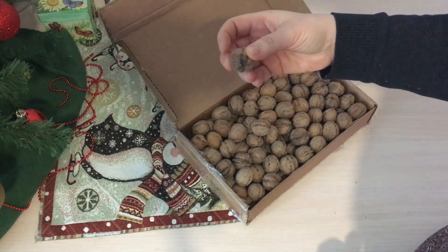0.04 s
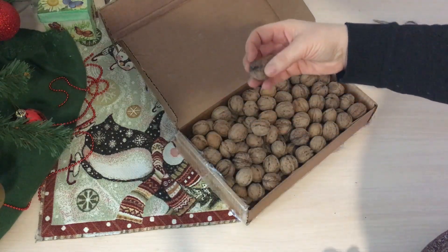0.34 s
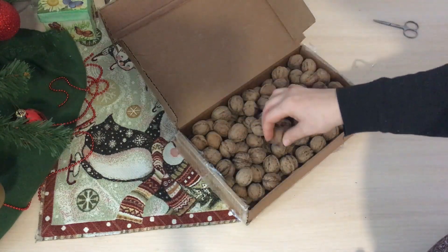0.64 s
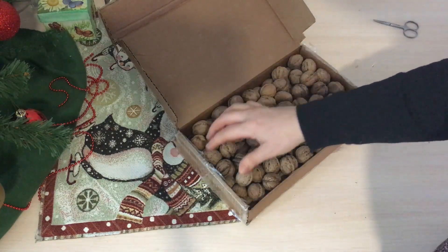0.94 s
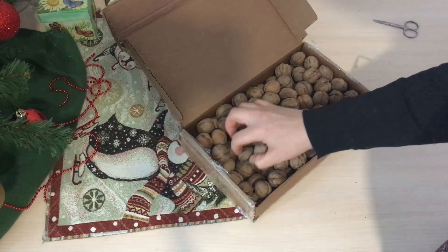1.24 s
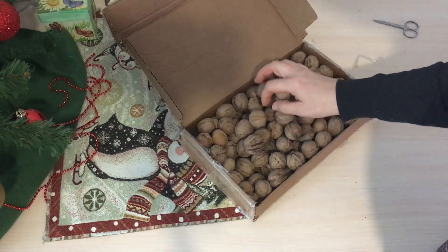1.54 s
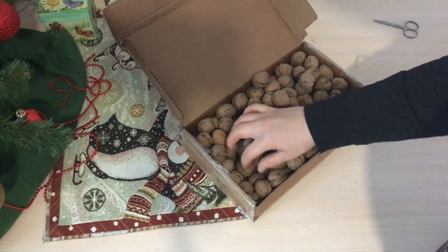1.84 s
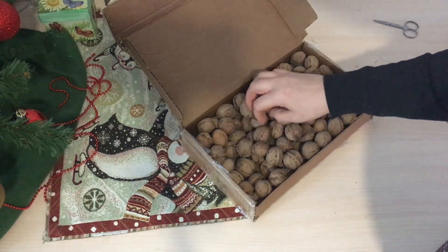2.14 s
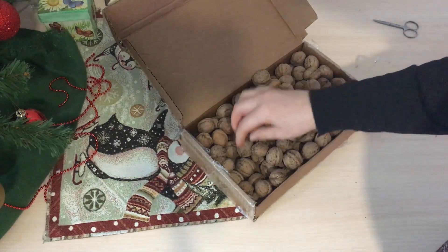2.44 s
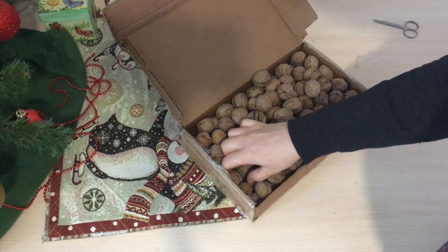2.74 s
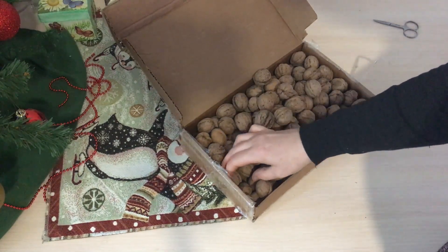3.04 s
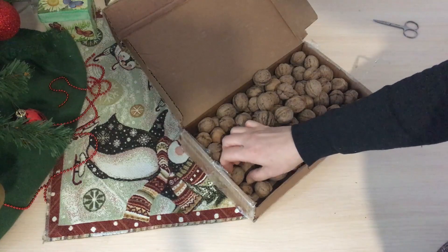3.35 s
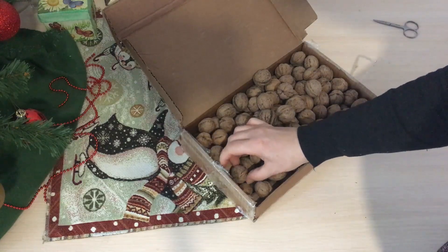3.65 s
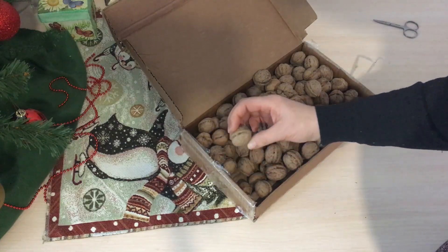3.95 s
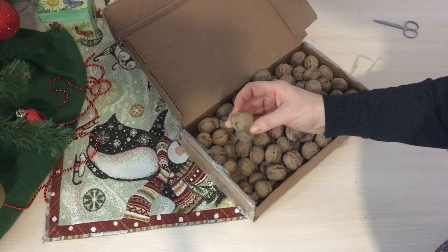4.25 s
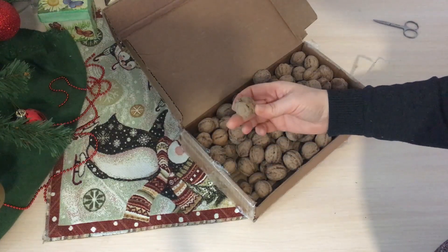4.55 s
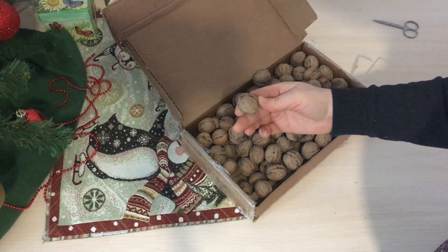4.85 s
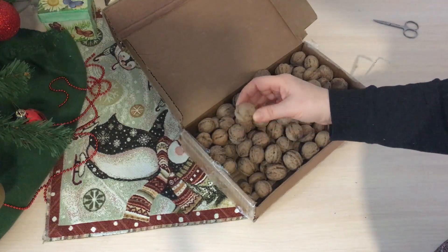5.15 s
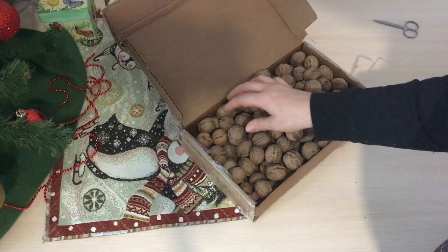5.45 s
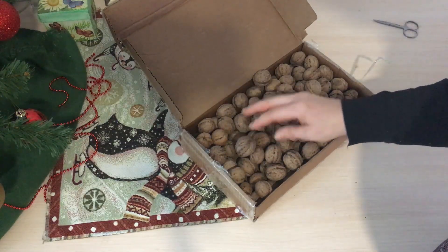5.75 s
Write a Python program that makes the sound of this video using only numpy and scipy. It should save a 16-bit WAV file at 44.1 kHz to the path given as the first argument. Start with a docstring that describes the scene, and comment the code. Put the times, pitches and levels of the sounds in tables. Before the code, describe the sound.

A walnut drops into a cardboard box of walnuts, then a hand stirs them, hollow shells clicking and grinding, before another nut drops.

```python
"""Walnuts in a shallow cardboard box on a table, in a small room. A sleeve rustles faintly as a hand
comes down, and at 0.7 s a nut drops in: shell cracks on shell and the hollow shells ring.
The hand stirs the heap: ridges grind, fingers brush the shells, nuts click and knock on the cardboard,
and the box floor booms. One nut is picked out, and after a pause it drops back at 5.4 s."""
import sys
import numpy as np
from scipy import signal
from scipy.fft import rfft, irfft, next_fast_len
from scipy.io import wavfile
from scipy.ndimage import map_coordinates

SR = 44100
rng = np.random.default_rng(int(sys.argv[2]) if len(sys.argv) > 2 else 0)


def master_out(mix):
    """Clip the mix to full scale and print it as 16-bit PCM to the path in sys.argv[1]."""
    frames = np.transpose(np.atleast_2d(mix))
    ceiling = np.clip(frames, -1, 1)
    pcm = np.round(ceiling * 32767).astype(np.int16)
    wavfile.write(sys.argv[1], SR, pcm)


N = 256000


# freq_hz, density_db
CRACK_AND_SKIN_SPECTRUM = [(1500, -38.5), (5000, -6.5), (8000, -7), (10200, -5), (12000, 2.5), (15200, 0.5),
                           (16500, -11)]
# start_s, level_db, pitch_hz
SHELL_STRIKES = [(0.7298, -6.5, 4100), (0.8037, -30.5, 4200), (0.832, -21.5, 3600), (0.9501, -32.5, 3140),
                 (1.2456, -23, 3550), (1.2846, -20.5, 4170), (1.3009, -19, 4400), (1.348, -12.5, 3890),
                 (1.3902, -25, 3354), (1.4097, -21, 3370), (1.499, -25, 4170), (1.5314, -21.5, 3330),
                 (1.5544, -22.5, 2670), (1.6323, -23.5, 2380), (1.6829, -16.5, 2540), (1.7386, -17.5, 4360),
                 (1.7796, -14, 3940), (2.0228, -22.5, 2260), (2.1776, -22, 3260), (2.2001, -18, 2200),
                 (2.3006, -23.5, 3060), (2.4029, -26.5, 2900), (2.541, -16, 2326), (2.6251, -24, 2220),
                 (2.831, -20.5, 1960), (2.9247, -21.5, 2170), (3.1228, -27, 2630), (3.5362, -18, 3320),
                 (3.692, -25.5, 2960), (4.1123, -30.5, 2620), (4.2888, -26, 2520), (4.364, -23.5, 3980),
                 (5.3752, -4.5, 4130), (5.478, -25, 2660), (5.682, -35, 2670)]


def shell_clicks(small_strikes):
    """Shell hits shell: a crack and a hollow ring. Returns the track and all strikes played."""
    track, t = np.zeros(N), np.arange(SR // 20) / SR
    strikes = list(SHELL_STRIKES) + small_strikes
    for start_s, level_db, pitch_hz in strikes:
        shell = ring(t, pitch_hz, octaves=1.15, skirt_db=17.5, t60_s=.008, count=18)
        burst = rng.standard_normal(len(t)) * amp(-60 * t / .0087)
        crack = coloured(burst, CRACK_AND_SKIN_SPECTRUM)
        click = amp(level_db - 22) * shell + amp(level_db - 36.5) * crack
        lid_delay_s = .0018 * rng.uniform(.8, 1.2)  # echo off the open lid
        click += amp(-5.5) * np.interp(t - lid_delay_s, t, click, left=0)
        add(track, start_s + .0005, room(click, near_db=-10.5, near_t60_s=.1, far_db=-10.5))
    return track, strikes


# start_s, level_db, pitch_hz
GAP_DROPS = [(0.963, -33, 1370), (1.301, -21.5, 1290), (1.682, -18, 910), (1.755, -18, 427),
             (1.768, -12, 384), (2.301, -28.5, 1010), (2.625, -27, 1294), (2.925, -24, 407),
             (4.365, -28, 839), (5.378, -14.5, 1367), (5.412, -18.5, 658), (5.525, -25.5, 644)]
HEAP_HZ, PITCH_SPREAD_OCT = 620, .3


def cardboard_knocks(strikes):
    """Nuts drop into gaps and thump the cardboard; each shell strike also knocks through the heap."""
    track, t = np.zeros(N), np.arange(SR // 20) / SR
    # the heap cushions harder strikes more
    nudges = [(start_s, -25 + .48 * level_db, HEAP_HZ * 2 ** (PITCH_SPREAD_OCT * rng.standard_normal()))
              for start_s, level_db, _ in strikes]
    soft_onset = 1 - np.exp(-t / .00061)
    for start_s, level_db, pitch_hz in list(GAP_DROPS) + nudges:
        modes = ring(t, pitch_hz, octaves=1.3, skirt_db=15, t60_s=.023, count=12)
        knock = amp(level_db - 17) * soft_onset * modes
        add(track, start_s + .0008, room(knock, near_db=-9.5, near_t60_s=.1, far_db=-7))
    return track + amp(1) * filtered(track, box_response)


# start_s, level_db
FINGERTIP_SKIDS = [(1.066, -44.5), (1.765, -45), (2.664, -35), (3.236, -42), (3.81, -53.5)]
# start_s, length_s, effort_db, floor_press_db, skin_touch_db
HAND_STROKES = [(0.82, 0.061, -51, -8, -25), (1.113, 0.17, -40.5, -3.5, -13),
                (1.28, 0.057, -34, -13, -19.5), (1.379, .18, -46.5, -2.5, -18),
                (1.741, 0.18, -44.5, 2.5, -17), (1.967, 0.18, -45, -4, -16),
                (2.174, 0.24, -41.5, -11, -22.5), (2.63, 0.051, -44, -8.5, -13),
                (2.812, 0.21, -40, -5.5, -11.5), (3.115, 0.19, -43.5, -1.5, -16),
                (3.316, .28, -48.5, 2.5, -17), (3.66, 0.24, -51.5, -2, -14), (4.246, 0.18, -62, 3, -21),
                (5.388, 0.069, -41.5, -0.5, -17), (5.678, 0.1, -49.5, -1, -15)]


def hand_levels(skid_half_s=.012):
    """The hand pushes the heap and skids over shells: dB curves for grind, boom and skin."""
    t = np.arange(N) / SR
    power = np.full((3, N), 1e-14)
    for start_s, length_s, effort_db, press_db, touch_db in HAND_STROKES:
        push = amp(effort_db + stroke_db(t, start_s, length_s))
        power += (push * amp([[0], [press_db], [touch_db]])) ** 2
    for centre_s, level_db in FINGERTIP_SKIDS:
        power[2] += amp(level_db) ** 2 * np.exp(-((t - centre_s) / skid_half_s) ** 2)
    return 10 * np.log10(power)


def jostles(rate_per_s=14, over_effort_db=13.5, spread_db=3.5, shell_hz=2740, max_count=12):
    """Small random strikes that follow each push: rows of start_s, level_db, pitch_hz."""
    rows = []
    for start_s, length_s, effort_db, _, _ in HAND_STROKES:
        times_s = start_s + length_s * rng.random(max_count)
        push_db = effort_db + stroke_db(times_s, start_s, length_s)
        level_db = push_db + over_effort_db + spread_db * rng.standard_normal(max_count)
        pitch_hz = shell_hz * 2 ** (PITCH_SPREAD_OCT * rng.standard_normal(max_count))
        rows += list(zip(times_s, level_db, pitch_hz))[:round(rate_per_s * length_s)]
    return rows


def stroke_db(t, start_s, length_s, attack_s=.035, swell_db=1.5, release_db_per_s=169):
    """A stroke takes hold, peaks halfway and dies away; level relative to its effort."""
    attack_db = 20 * np.log10(np.clip((t - start_s) / attack_s + .5, 1e-5, 1))
    arch = np.sin(np.pi * np.clip((t - start_s) / length_s, 0, 1)) - 1
    return attack_db + swell_db * arch - release_db_per_s * np.maximum(t - start_s - length_s, 0)


# freq_hz, density_db
GRIND_SPECTRUM = [(130, -32), (220, -7), (265, -2), (300, -5), (373, -5), (559, 0.5), (613, -1),
                  (774, -9.5), (836, -2), (1140, -6), (1310, -2.5), (1490, -9.5), (2600, -8), (7470, -25.5),
                  (9000, -19), (11700, -64), (19800, -120)]


def shell_grind(level_db, fits):
    """Wrinkled shells slip ridge over ridge in fits and shake the box."""
    slips = grains(rate_per_s=2400, low_hz=251, high_hz=6906, t60_s=.005, scatter_db=4.5)
    grind = amp(level_db - 1 + 3.46 * fits) * coloured(slips, GRIND_SPECTRUM)
    return grind + amp(-5) * filtered(grind, box_response)


def skin_brush(level_db, fits):
    """Fingers rasp over the shells in tiny, bright slips."""
    rasp = grains(rate_per_s=1900, low_hz=3945, high_hz=15750, t60_s=.002, scatter_db=1.5)
    return amp(level_db + 3.35 * fits + 1.4 * wobble(110)) * coloured(rasp, CRACK_AND_SKIN_SPECTRUM)


# freq_hz, density_db
BOOM_SPECTRUM = [(20, -33.5), (55, -11.5), (105, -8.5), (140, -2.5), (167, 2), (205, -13.5), (300, -23.5),
                 (600, -64.5)]


def floor_boom(level_db):
    """The box floor booms under the pushed heap."""
    return amp(level_db - 1) * coloured(rng.standard_normal(N), BOOM_SPECTRUM)


# centre_hz, width_hz, gain_db
BOX_MODES = [(141, 22, -9), (165.8, 49, -2.5), (270, 21, -14.5), (383, 45, 1.5), (612, 30, -4),
             (740, 25, -8), (880, 40, -9.5)]


def box_response(hz):
    """Resonances of the cardboard panels under the weight of the nuts."""
    return sum(amp(gain_db) * 1j * hz * width_hz / (centre_hz ** 2 - hz ** 2 + 1j * hz * width_hz)
               for centre_hz, width_hz, gain_db in BOX_MODES)


# time_s, level_db
SLEEVE_LEVELS = [(0, -64), (.25, -68), (.45, -73), (.7, -72)]
# freq_hz, density_db
CLOTH_SPECTRUM = [(100, -13), (280, -3.5), (420, -14), (2200, -17.5), (4500, -21.5), (15000, -27)]


def sleeve_rustle():
    """Cloth on the moving arm, strongest at the start."""
    level_db = np.interp(np.arange(N) / SR, *np.transpose(SLEEVE_LEVELS))
    return amp(level_db + 1.2 * wobble(20)) * coloured(rng.standard_normal(N), CLOTH_SPECTRUM)


# freq_hz, t60_s
ROOM_DECAY = [(200, .36), (1000, 0.38), (4000, 0.24), (12000, 0.21)]


def room(x, near_db, near_t60_s, far_db):
    """x plus quick scatter from box and table, and the longer tail of the room."""
    t = np.arange(SR // 3) / SR
    hz, frame_s, spectra = signal.stft(rng.standard_normal(len(t)), SR, nperseg=256)
    decay = amp(-60 * frame_s / along(ROOM_DECAY, hz)[:, None])
    far = signal.istft(spectra * decay, SR, nperseg=256)[1][:len(t)] * (t > .005)
    near = rng.standard_normal(len(t)) * amp(-60 * t / near_t60_s) * (t > .002)
    impulse = amp(near_db) * near / np.linalg.norm(near) + amp(far_db) * far / np.linalg.norm(far)
    impulse[0] = 1  # direct sound
    return signal.fftconvolve(x, impulse)


# freq_hz, density_db
ROOM_TONE_SPECTRUM = [(12, -51), (20, -23.5), (33, -6), (58, -6), (81, -20), (123, -2), (172, -33),
                      (270, -19.5), (301, -17.5), (472, -34), (1260, -35), (4940, -42), (12400, -38),
                      (16000, -40)]


def room_tone(level_db=-63.5):
    """Steady low noise of the room."""
    return amp(level_db) * coloured(rng.standard_normal(N), ROOM_TONE_SPECTRUM)


def ring(t, centre_hz, octaves, skirt_db, t60_s, count):
    """Damped modes, strongest near the centre, different for every hit."""
    offset = 2 * (np.arange(count) + rng.random(count)) / count - 1
    gain = rng.choice([-1, 1], count) * amp(-skirt_db * np.abs(offset) + rng.normal(0, 1.7, count))
    hz = centre_hz * 2 ** (octaves * offset)
    return unit(gain @ np.sin(2 * np.pi * hz[:, None] * t) * amp(-60 * t / t60_s))


def grains(rate_per_s, low_hz, high_hz, t60_s, scatter_db, max_count=16000):
    """Tiny slips: short rings at random times and pitches, flat across the band."""
    when, pitch, phase, size = rng.random((max_count, 4)).T
    hz = low_hz * (high_hz / low_hz) ** pitch
    active = np.arange(max_count) < rate_per_s * N / SR
    gain = active * np.sqrt(hz) * amp(-scatter_db * np.log(np.maximum(size, .02)))
    k = np.arange(SR // 100)
    tones = np.sin(2 * np.pi * (hz[:, None] * k / SR + phase[:, None]))
    rings = gain[:, None] * tones * amp(-60 * k / SR / t60_s)
    positions = (when * N).astype(int)[:, None] + k
    return np.bincount(positions.ravel(), rings.ravel(), N)[:N]


def amp(db):
    """Decibels to gain."""
    return 10 ** (np.asarray(db) / 20)


def unit(x):
    """Scale to rms 1."""
    return x / np.sqrt(np.mean(x ** 2) + 1e-20)


def along(points, hz):
    """Read (freq_hz, value) points on a log axis."""
    freq_hz, values = np.transpose(points)
    return np.interp(np.log(hz + 1), np.log(freq_hz + 1), values)


def wobble(knots_per_s):
    """Smooth random curve."""
    knots = rng.standard_normal(int(N * knots_per_s / SR) + 4)
    return map_coordinates(knots, [np.arange(N) * knots_per_s / SR])


def filtered(x, response):
    """Apply a frequency response."""
    size = next_fast_len(2 * len(x))
    return irfft(rfft(x, size) * response(np.fft.rfftfreq(size, 1 / SR)), size)[:len(x)]


def coloured(x, spectrum):
    """Shape x by a spectrum, at rms 1."""
    return unit(filtered(x, lambda hz: amp(along(spectrum, hz))))


def add(track, start_s, sound):
    """Mix a sound into a track."""
    start = max(round(start_s * SR), 0)
    part = track[start:start + len(sound)]
    part += sound[:len(part)]


def scene():
    """All sources at one microphone above the table."""
    clicks, strikes = shell_clicks(jostles())
    knocks = cardboard_knocks(strikes)
    grind_db, boom_db, skin_db = hand_levels()
    fits = wobble(45)  # shells and skin surge together
    friction = shell_grind(grind_db, fits) + skin_brush(skin_db, fits)
    stirring = room(friction, near_db=-7, near_t60_s=.06, far_db=-9)[:N] + floor_boom(boom_db)
    return (clicks + knocks + stirring + sleeve_rustle() + room_tone())[None]


def record(dry, cutoff_hz=16100):
    """Steep low-pass."""
    return filtered(dry[0], lambda hz: 1 / np.sqrt(1 + (hz / cutoff_hz) ** 160))[None]


dry = scene()
out = record(dry)
master_out(out)
```